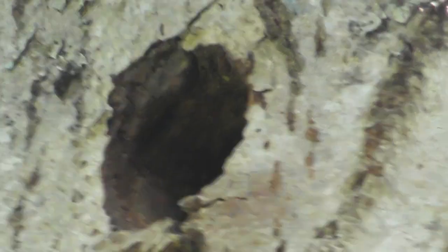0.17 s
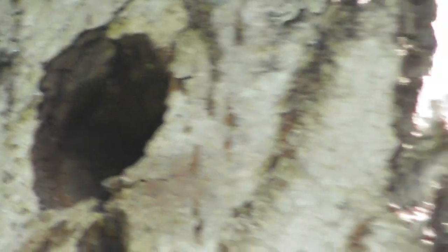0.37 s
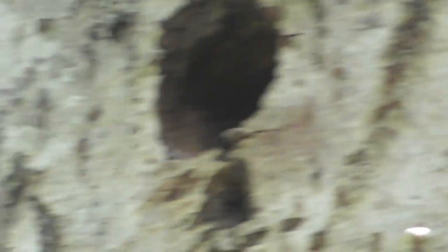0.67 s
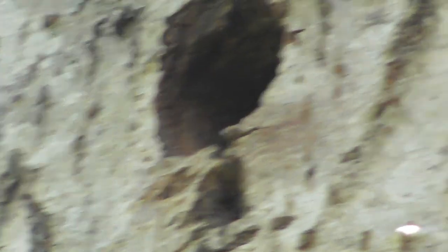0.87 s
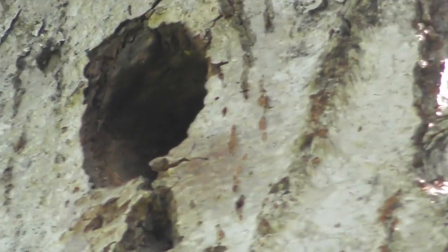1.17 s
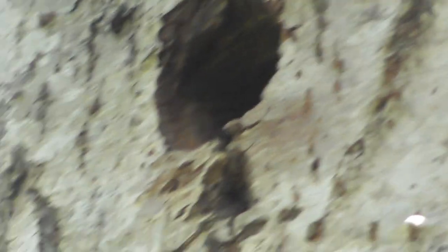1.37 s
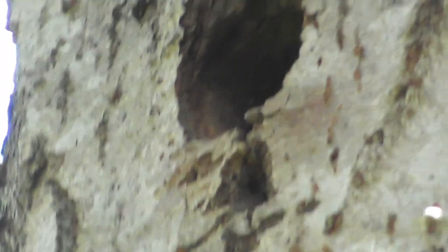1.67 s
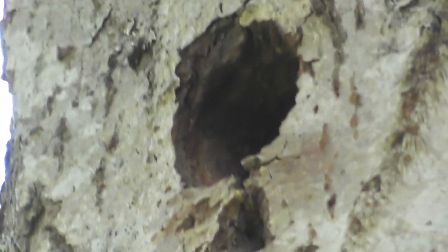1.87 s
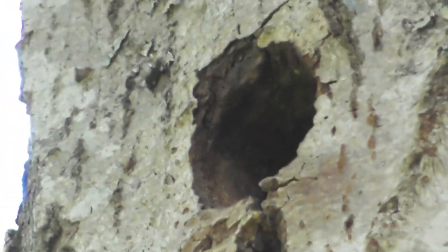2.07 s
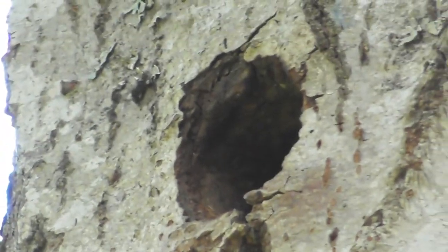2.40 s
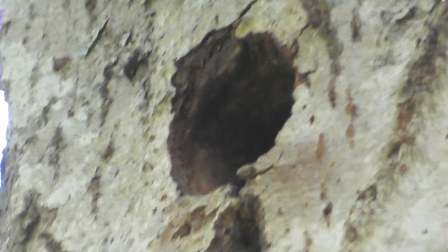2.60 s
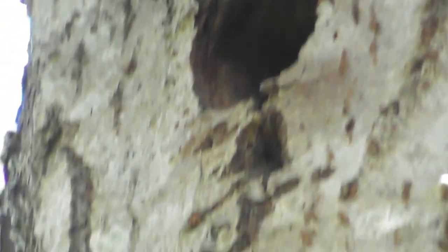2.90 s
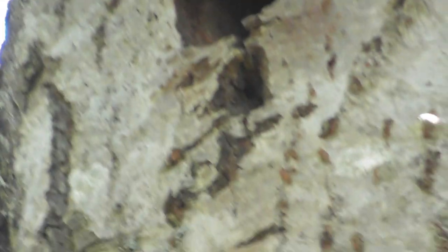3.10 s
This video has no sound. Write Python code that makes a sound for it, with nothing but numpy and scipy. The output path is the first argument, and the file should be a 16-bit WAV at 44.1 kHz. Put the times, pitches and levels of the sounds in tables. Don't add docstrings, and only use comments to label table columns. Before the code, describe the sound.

A nestling begs rapidly with shrill chirps from a tree hole, echoing through quiet woods.

```python
import sys
import numpy as np
from scipy import signal
from scipy.fft import rfft, irfft
from scipy.io import wavfile
from scipy.ndimage import uniform_filter1d

SR = 44100
rng = np.random.default_rng(int(sys.argv[2]) if len(sys.argv) > 2 else 0)


def rack_gain(trim_db):
    fader = np.asarray(trim_db, float)
    return 10 ** (fader / 20)


def dump_mix(stems):
    frames = np.atleast_2d(stems).T
    limited = np.clip(frames, -1, 1)
    pcm = np.round(limited * 32767).astype(np.int16)
    wavfile.write(sys.argv[1], SR, pcm)


N = 143325
LEAD = SR // 5
EDGE_HZ = 15740

# pitch_hz, level_db (per Hz)
RUSTLE = [(30, -42), (100, -29), (200, -24.5), (480, -24.5), (800, -13), (1100, -11), (1500, -19),
          (2200, -40)]
# pitch_hz, level_db (per Hz)
SONG = [(1300, -46.5), (1600, -15.5), (2200, -13), (3500, -10.5), (5000, -17), (7000, -8.5), (11700, -24.5),
        (15600, -32)]
WASH_DB, RUSTLE_PATCHY_DB, SONG_PATCHY_DB = -56, 0.8, 2.5

# start_s, length_s, level_db, pitch_hz
COOS = [
    (-.1, 0.13, -56.5, 2144),
    (0.441, 0.31, -57.5, 2107),
    (1.085, 0.19, -59.5, 2090),
    (1.635, 0.23, -59.5, 2070),
    (2.268, 0.22, -56, 2103),
    (2.798, 0.23, -59, 2093),
]
# start_s, length_s, level_db, from_hz, to_hz
FAR_NOTES = [(0.738, 0.24, -58, 3450, 3400), (0.876, 0.055, -58, 4000, 4480),
             (0.654, 0.17, -58.5, 4550, 4390), (0.911, .1, -66, 3160, 3250), (.42, 0.21, -64, 3590, 3300),
             (1.13, 0.15, -57, 3460, 3290), (1.266, 0.34, -61, 3266, 3180), (1.35, 0.13, -65, 2760, 2790),
             (1.601, 0.17, -63.5, 3290, 3240), (1.9, 0.14, -63, 3500, 3430),
             (2.069, 0.07, -58.5, 3250, 3240), (2.501, 0.16, -69, 3420, 3480),
             (0.401, 0.078, -62, 1037, 866), (1.6, 0.11, -64, 811, 894), (1.832, 0.026, -60, 755, 920),
             (2.22, .06, -63.5, 817, 780), (2.978, .06, -64.5, 886, 962)]
COO_WIDTH_HZ, FAR_WIDTH_HZ = 224, 120

# pitch_hz, t60_s
TRUNK = [(2000, 0.064), (6000, 0.24), (9000, 0.085), (14000, 0.05)]
SLAP = [(2000, 0.056), (7000, 0.1), (14000, 0.023)]
WOOD = [(2000, 1), (6000, 1), (9000, 0.39), (14000, .25)]
TRUNK_DB, SLAP_DB, WOOD_DB = -7, -18, -17.5
TRUNK_S, SLAP_S, WOOD_S = 0.012, 0.05, 0.03
# pitch_hz, level_db
ECHO_COLOUR = [(1500, -16), (2400, -8), (4500, -3), (5800, -2), (6500, -3.5), (7200, 2), (8500, -3),
               (15000, -11)]
BLUR = 0.67

# pitch_hz, width_hz, level_db
HOLE = [(2130, 540, 0.5), (3005, 400, 2.5), (4080, 338, 5.5), (5968, 440, 2.5), (7213, 623, 5.5),
        (8873, 1170, 2), (9550, 670, 7), (11340, 1880, 3), (14560, 1320, -2)]
HOLE_CUT_HZ = 760

# start_s, length_s, effort_db, top_hz
YELPS = [
    (0.616, .035, -48.5, 1159),
    (2.111, 0.04, -45.5, 1185),
]
YELP_DB = [-20, -8, -2.5, 0.5, -12, -10, -12, -9]
YELP_ARCH, YELP_FLAT, YELP_RASP = 0.5, 0.45, 0.5
YELP_WET_DB = 5

# start_s, break_s, drop_s
CALL_TIMES = [(-.115, -.09, -.05), (.101, .128, .167), (.316, .338, .377), (.527, .539, .576),
              (.713, .743, .778), (.924, .951, .987), (1.124, 1.145, 1.183), (1.332, 1.351, 1.385),
              (1.521, 1.546, 1.582), (1.735, 1.753, 1.785), (1.927, 1.953, 1.987), (2.130, 2.157, 2.189),
              (2.334, 2.354, 2.386), (2.527, 2.547, 2.583), (2.722, 2.747, 2.781), (2.925, 2.949, 2.982),
              (3.116, 3.139, 3.174)]
# effort_db, high_hz
CALL_EFFORTS = [(-31, 2965), (-33.5, 2950), (-34.5, 2910), (-35, 2885), (-36, 2890), (-35.5, 2885),
                (-35.5, 2880), (-37, 2885), (-35.5, 2900), (-35, 2880), (-37, 2890), (-36.5, 2880),
                (-37, 2855), (-37, 2890), (-37.5, 2890), (-38, 2875), (-38, 2885)]
LOW_DB = [-13, -12.5, -3.5, -6.5, -12.5, -21]
HIGH_DB = [-20.5, -6, -1.5, -12, -22, -43]
DROP_DB = [-14.5, -15, -20, -17, -59, -28]
# pitch_hz, level_db
AIR = [(800, -52), (4500, -16.5), (7000, -7.5), (8200, -4), (9500, -14), (11600, -6), (15500, -39)]
LOW_HZ, LOW_CLIMB_HZ, CLIMB_POWER = 2272.6, 195.4, 2.67
SAG_HZ, SAG_POWER = 300, 2.5
DROP_HZ, DROP_FALL_HZ, DROP_S = 2200, 700, 0.021
HOOK_BASE_HZ = 2860
HOOK_GAIN, HOOK_S, EASE_GAIN, EASE_S = 2.63, 0.00463, 1.63, 0.00515
BREAK_S, BREAK_DB = 0.0014, 4.5
FALL_S, CATCH_DB = 0.004, -7
ATTACK_S, PUFF_S, PUFF_DB, HISS_DB = 0.006, 0.005, -12, -18.5
JITTER, SHIMMER_DB = 0.003, 2.6


def evened(x):
    return x / np.sqrt(np.mean(x ** 2) + 1e-20)


def read(points, hz):
    f, value = np.transpose(points)
    return np.interp(np.log(hz + 1), np.log(f + 1), value)


def add(mix, start_s, sound):
    part = mix[round(start_s * SR) + LEAD:][:len(sound)]
    part += sound[:len(part)]


def wobble(count, size):
    return evened(uniform_filter1d(uniform_filter1d(rng.standard_normal(count), size), size))


def coloured(x, points):
    return irfft(rfft(x) * rack_gain(read(points, np.fft.rfftfreq(len(x), 1 / SR))), len(x))


def wash():
    hz = np.fft.rfftfreq(1024, 1 / SR)
    a, b, patches = rng.standard_normal((N // 256 + 5, 513, 3)).T
    patches = uniform_filter1d(patches, size=14, axis=0)
    patches = evened(uniform_filter1d(patches, size=16, axis=1))
    rustle = rack_gain(read(RUSTLE, hz)[:, None] + RUSTLE_PATCHY_DB * patches)
    song = rack_gain(read(SONG, hz)[:, None] + SONG_PATCHY_DB * patches)
    noise = signal.istft((a + 1j * b) * (rustle + song), nperseg=1024, noverlap=768)[1]
    return rack_gain(WASH_DB) * evened(noise[:N])


def far_note(start, length, db, from_hz, to_hz, width_hz):
    u = np.clip(np.arange(13230) / SR / length, 0, 1)
    r = np.exp(-np.pi * width_hz / SR)
    blur = rng.standard_normal(len(u)) + 1j * rng.standard_normal(len(u))
    for _ in range(2):
        blur = signal.lfilter([1], [1, -r], blur)
    hz = from_hz + (to_hz - from_hz) * u
    tone = (blur * np.exp(2j * np.pi * np.cumsum(hz) / SR)).real
    return start, rack_gain(db) * np.sqrt(np.sin(np.pi * u)) * evened(tone)


def echoes(x, decay, delay_s):
    taps, at = np.zeros(SR), np.arange(0, SR - 20, 20)
    taps[at + rng.integers(0, 20, len(at))] = rng.choice([-1., 1.], len(at))
    hz, t, z = signal.stft(taps, SR, nperseg=128)
    fade = rack_gain(-60 * t / read(decay, hz)[:, None])
    tail = signal.istft(z * fade, SR, nperseg=128)[1]
    late = np.pad(x, (round(delay_s * SR), 0))
    return signal.fftconvolve(late, tail / np.linalg.norm(tail))[:len(x)]


def hole(x):
    hz = np.fft.rfftfreq(len(x), 1 / SR)
    rings = 0
    for k, (f_hz, width_hz, db) in enumerate(HOLE):
        rings = rings + (-1) ** k * rack_gain(db) / (1 + 2j * (hz - f_hz) / width_hz)
    low_cut = 1 + (HOLE_CUT_HZ / (hz + 1)) ** 4
    return irfft(rfft(x) * rings / low_cut, len(x))


def stack(hz, levels_db):
    turns = 2 * np.pi * np.cumsum(hz) / SR
    voice = 0
    for k, db in enumerate(levels_db, 1):
        level = rack_gain(db + SHIMMER_DB * wobble(len(hz), size=90))
        tone = np.sin(k * turns + 2 * np.pi * rng.random())
        voice = voice + level * tone * (k * hz < 16000)
    return voice


def yelp(start, length, effort_db, top_hz):
    u = np.arange(2205) / SR / length
    arch = np.sin(np.pi * np.clip(u, 0, 1) ** 0.9)
    hz = top_hz * (1 - YELP_ARCH + YELP_ARCH * arch ** YELP_FLAT)
    rasp = 1 + YELP_RASP * wobble(len(u), size=24)
    return start, rack_gain(effort_db) * np.sqrt(arch) * stack(hz, YELP_DB) * rasp


def beg(start, break_s, drop_s, effort_db, high_hz):
    low_s, high_s = break_s - start, drop_s - break_s
    t = np.arange(4410) / SR - 4 * PUFF_S
    since_break, since_drop = t - low_s, t - low_s - high_s
    up = np.clip(since_break / BREAK_S + 0.5, 0, 1)
    down = np.clip(since_drop / FALL_S + 0.5, 0, 1)
    gone = np.clip(since_drop / DROP_S, 0, 1)
    share = np.array([1 - up, up - down, down])

    over_hz = max(high_hz - HOOK_BASE_HZ, 0)
    hook_hz = HOOK_GAIN * over_hz * np.exp(-(t / HOOK_S) ** 2)
    ease_hz = EASE_GAIN * over_hz * np.exp(-abs(since_break) / EASE_S)
    low = LOW_HZ + LOW_CLIMB_HZ * np.clip(t / low_s, 0, 1) ** CLIMB_POWER + hook_hz
    high = high_hz - ease_hz - SAG_HZ * np.clip(since_break / high_s, 0, 1) ** SAG_POWER
    drop = DROP_HZ - DROP_FALL_HZ * gone
    hz = (share * [low, high, drop]).sum(0) * (1 + JITTER * wobble(len(t), size=60))

    levels_db = np.transpose([LOW_DB, HIGH_DB, DROP_DB]) @ share
    levels_db = levels_db + BREAK_DB * np.exp(-(since_break / BREAK_S) ** 2)
    levels_db = levels_db + CATCH_DB * np.exp(-(since_drop / FALL_S * 2) ** 2)
    shape = np.clip(t / ATTACK_S, 0, 1) * np.cos(gone * np.pi / 2)
    air = evened(coloured(rng.standard_normal(len(t)), AIR))
    puff = rack_gain(PUFF_DB) * np.exp(-abs(t) / PUFF_S)
    breath = (rack_gain(HISS_DB) * shape * (1 - gone) + puff) * air
    return start - 4 * PUFF_S, rack_gain(effort_db) * (shape * stack(hz, levels_db) + breath)


def scene():
    chick, sibling, far = np.zeros((3, N + LEAD))
    for start, length, db, hz in COOS:
        add(far, *far_note(start, length, db, hz, hz, COO_WIDTH_HZ))
    for row in FAR_NOTES:
        add(far, *far_note(*row, FAR_WIDTH_HZ))
    for row in YELPS:
        add(sibling, *yelp(*row))
    for times, effort in zip(CALL_TIMES, CALL_EFFORTS):
        add(chick, *beg(*times, *effort))
    sent = hole(chick + rack_gain(YELP_WET_DB) * sibling)
    sent = coloured(sent * (1 + BLUR * wobble(len(sent), size=40)), ECHO_COLOUR)
    wet = rack_gain(TRUNK_DB) * echoes(sent, TRUNK, TRUNK_S)
    wet = wet + rack_gain(SLAP_DB) * echoes(sent, SLAP, SLAP_S)
    wet = wet + rack_gain(WOOD_DB) * echoes(sent, WOOD, WOOD_S)
    nest = hole(chick + sibling)
    return ((nest + wet + far)[LEAD:] + wash())[None]


def roll_off(x):
    return signal.sosfilt(signal.butter(12, 15740, fs=SR, output="sos"), x)


def record(dry):
    low_pass = signal.firwin(511, EDGE_HZ, window=("kaiser", 9), fs=SR)
    mix = signal.oaconvolve(dry, low_pass[None], "same")
    return roll_off(mix)


dry = scene()
out = record(dry)
dump_mix(out)
```